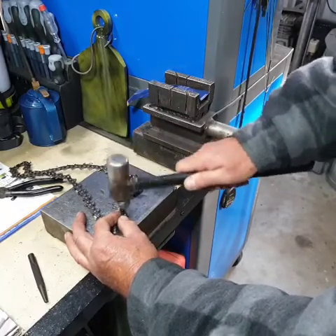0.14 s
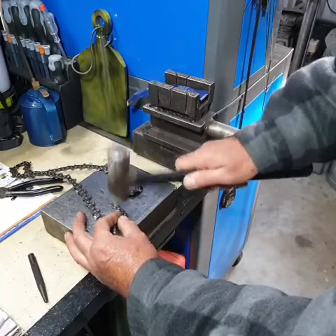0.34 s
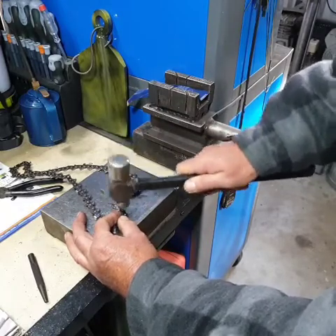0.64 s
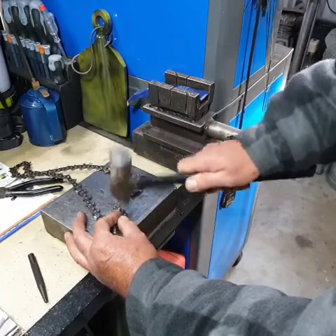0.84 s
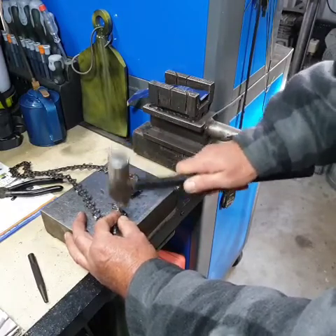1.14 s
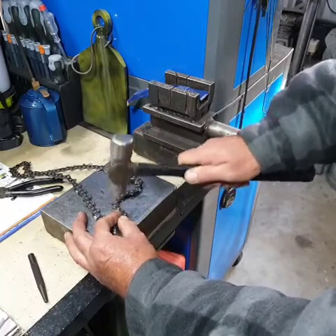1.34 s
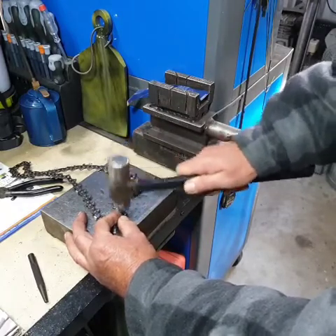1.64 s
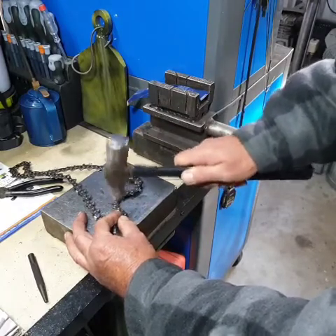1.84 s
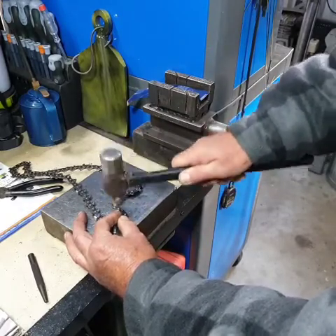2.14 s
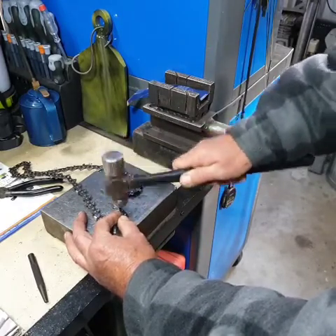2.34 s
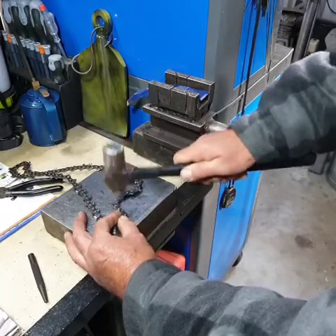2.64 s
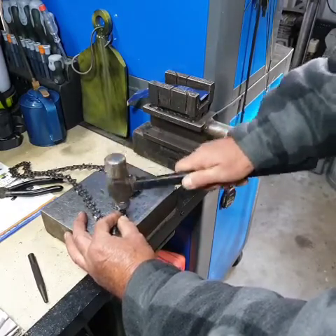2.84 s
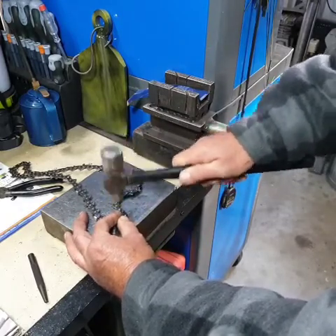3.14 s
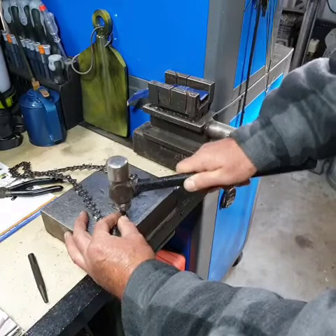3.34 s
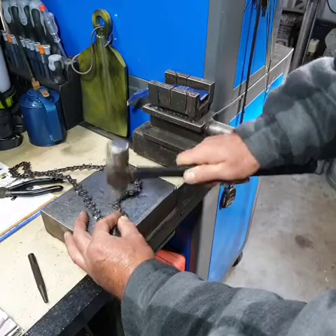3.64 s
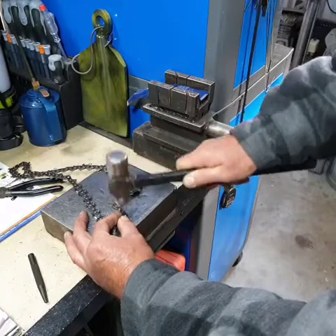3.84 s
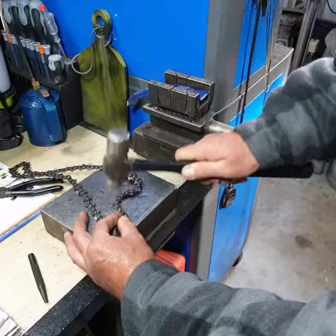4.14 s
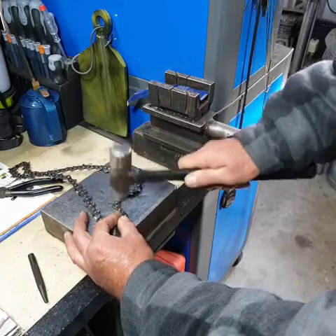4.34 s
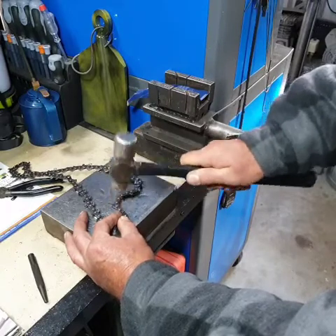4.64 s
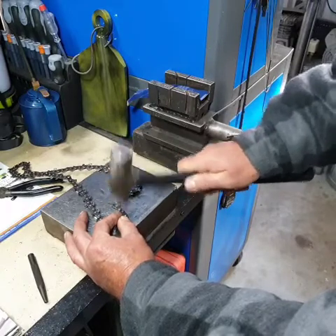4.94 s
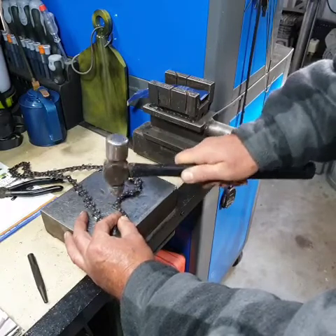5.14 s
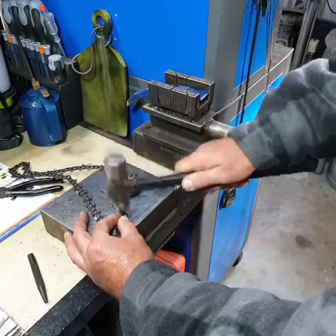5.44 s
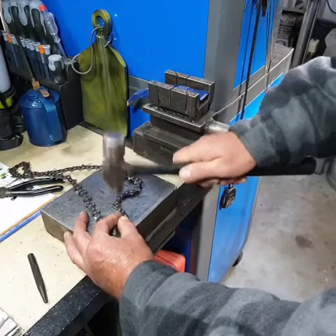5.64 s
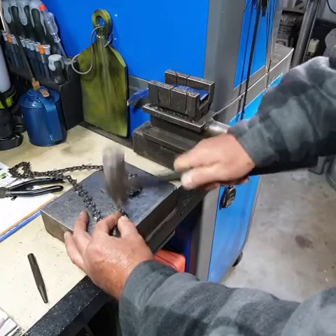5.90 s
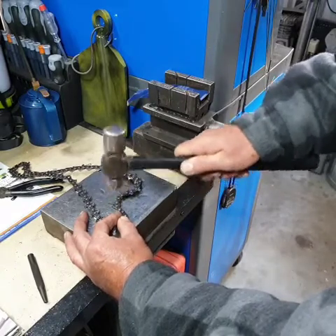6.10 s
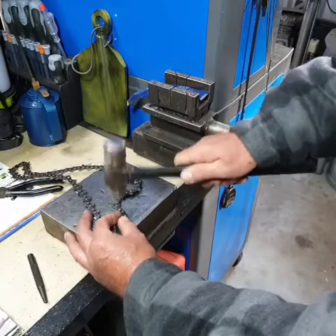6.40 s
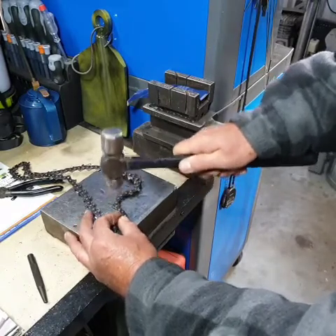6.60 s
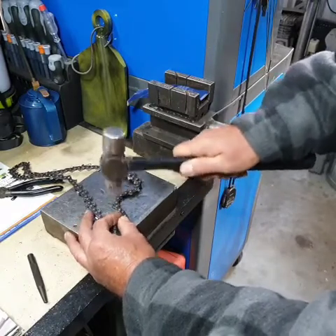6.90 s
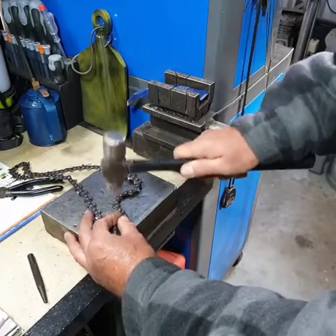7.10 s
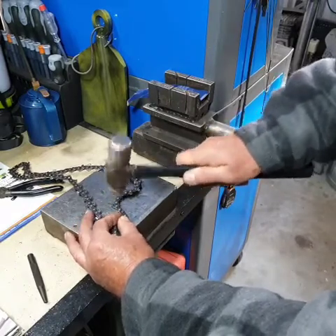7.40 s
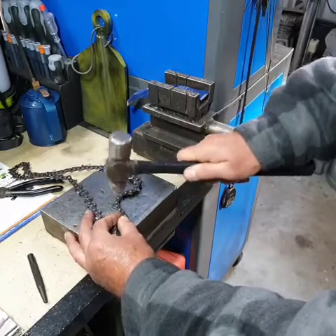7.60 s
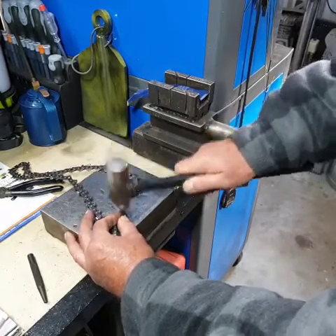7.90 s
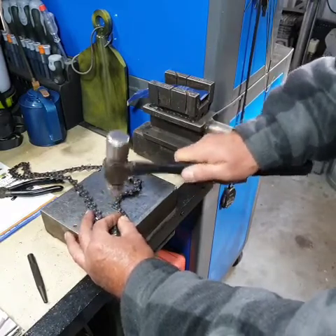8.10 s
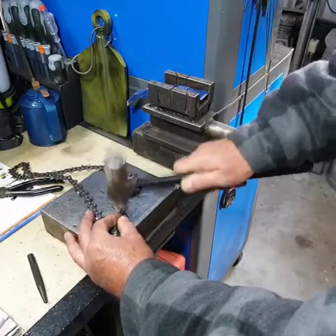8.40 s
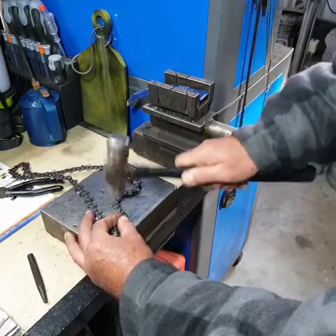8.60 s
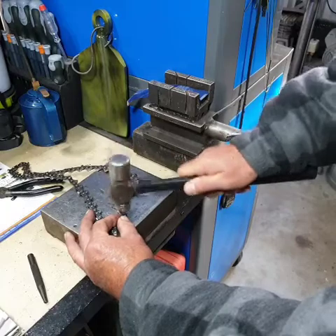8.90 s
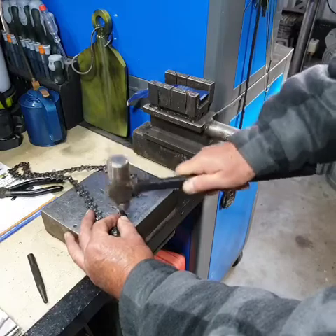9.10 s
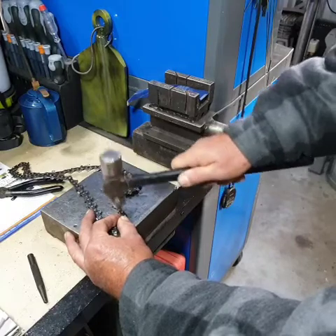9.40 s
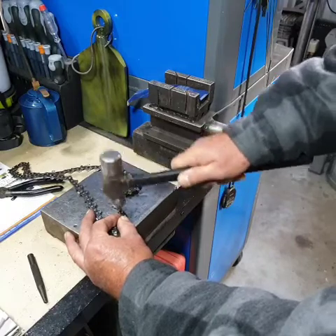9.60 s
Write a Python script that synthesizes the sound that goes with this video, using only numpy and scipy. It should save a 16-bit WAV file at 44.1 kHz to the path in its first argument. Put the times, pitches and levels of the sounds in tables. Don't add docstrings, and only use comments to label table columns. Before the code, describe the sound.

Rapid steady hammer taps on steel, each a short hard knock with a bright metallic tick and chain rattle, in a small room.

```python
import sys
import numpy as np
from scipy import signal
from scipy.fft import rfft, irfft
from scipy.io import wavfile
from scipy.ndimage import uniform_filter1d, minimum_filter1d

SR = 44100
rng = np.random.default_rng(int(sys.argv[2]) if len(sys.argv) > 2 else 0)


def waveform_to_disk(signal):
    frames = np.transpose(np.atleast_2d(signal))
    scaled = np.clip(frames, -1, 1) * 32767
    samples = np.round(scaled).astype(np.int16)
    wavfile.write(sys.argv[1], SR, samples)


def boost(x):
    u = np.asarray(x, float) / 20
    return 10 ** u


N = 429975
LEAD, TAIL = SR // 5, SR * 11 // 20
t = np.arange(TAIL) / SR


def along(points, hz, col=1):
    table = np.transpose(points)
    return np.interp(np.log(hz + 1), np.log(table[0] + 1), table[col])


def coloured(noise, points):
    hz = np.fft.rfftfreq(noise.shape[-1], 1 / SR)
    return irfft(rfft(noise) * boost(along(points, hz)), noise.shape[-1])


def hiss():
    hz, frames, z = signal.stft(rng.standard_normal((2, TAIL)), SR, nperseg=1024)
    return hz[:, None], frames, z


# pitch_hz, likeness (1 = the same)
LEFT_RIGHT_LIKENESS = [(60, 0.94), (290, 0.98), (640, 0.35), (1400, 0.039), (3000, 0.074), (15000, 0)]


def paired(z, hz):
    turn = np.arccos(np.clip(along(LEFT_RIGHT_LIKENESS, hz), -1, 1)) / 2
    mid = z[0] * np.cos(turn)
    side = z[1] * np.sin(turn)
    pair = signal.istft(np.array([mid + side, mid - side]), SR, nperseg=1024)[1][:, :TAIL]
    return pair / np.sqrt(np.mean(pair[:, :SR // 20] ** 2))


def rise(seconds):
    return 1 - np.exp(-t / seconds)


def silence():
    return np.zeros((2, LEAD + N + TAIL))


def add(out, start_s, sound):
    first = LEAD + round(start_s * SR)
    out[:, first:][:, :TAIL] += sound


# pitch_hz, level_db (per Hz)
AIR_COLOUR = [(30, -14), (60, 5.5), (200, -12), (500, -13.5), (2000, -36.5), (8000, -58)]


def air():
    noise = rng.standard_normal(N) + 0.3 * rng.standard_normal((2, N))
    rumble = coloured(noise, AIR_COLOUR)
    return boost(-65.5) * rumble / rumble.std()


# start_s, level_db, t60_s (time to fade 60 dB), rise_s, top_hz
FAR_CLACKS = [
    (5.211, -41, 0.3137, 0.0068, 8300),
    (5.679, -53, 0.4045, 0.017, 8000),
    (6.226, -38.5, 0.27, 0.0036, 15000),
    (6.522, -47, 0.44, 0.0018, 15000),
]


def far_clacks():
    out = silence()
    for start_s, level_db, t60_s, rise_s, top_hz in FAR_CLACKS:
        hz, _, z = hiss()
        bass_loss = 1 / (1 + (900 / (hz + 1)) ** 2)
        top_loss = 1 / (1 + (hz / top_hz) ** 8) / np.sqrt(1 + (hz / 4000) ** 2)
        sound = paired(z * bass_loss * top_loss, hz)
        add(out, start_s, boost(level_db - 60 * t / t60_s) * rise(rise_s) * sound)
    return out


# start_s, pitch_hz, level_db, t60_s
LINK_PINGS = [
    (.37, 4600, -72, .5),
    (.37, 6400, -77, .5),
    (3.13, 4620, -66, 0.44),
]


def link_pings():
    out = silence()
    for start_s, pitch_hz, level_db, t60_s in LINK_PINGS:
        drift = np.cumsum(0.082 * rng.standard_normal((2, TAIL)), axis=1)
        tone = np.sin(2 * np.pi * pitch_hz * t + drift)
        add(out, start_s, boost(level_db - 60 * t / t60_s) * rise(0.0092) * tone)
    return out


# pitch_hz, level_db
STEEL_COLOUR = [(3000, -2.5), (6000, -6.5), (8500, 3), (11800, 5.5), (14000, -1.5), (15500, -28.5)]
# start_s, level_db
LINK_BOUNCES = [
    (9.493, -47),
    (9.499, -50),
]


def link_bounces():
    out = silence()
    for start_s, level_db in LINK_BOUNCES:
        click = coloured(rng.standard_normal((2, TAIL)), STEEL_COLOUR)
        add(out, start_s, boost(level_db - 60 * t / 0.00806) * click)
    return out


# pitch_hz, early_t60_s, late_t60_s
ROOM_DECAY = [(61, 0.83, 1), (294, 0.15, 0.72), (1016, 0.17, 0.47), (3000, 0.15, 0.45), (8000, 0.17, 0.4),
              (15000, 0.16, 0.29)]


def room_fade(hz, frames):
    early = boost(-60 * frames / along(ROOM_DECAY, hz))
    late = boost(-15.5 - 60 * frames / along(ROOM_DECAY, hz, col=2))
    return early + late


# pitch_hz, level_db
RATTLE_COLOUR = [(2500, -11), (4000, 1), (6000, -0.5), (9000, 1.5), (12000, -3), (14500, -4), (15500, -46)]


def chain_rattle():
    hz, frames, z = hiss()
    z = z * room_fade(hz, frames) * boost(along(RATTLE_COLOUR, hz))
    return paired(z, hz) * rise(0.00067)


# pitch_hz, level_db, t60_s
HEAD_TONES = [(13350, -32.5, .25), (7300, -31.5, .12), (10900, -34, 0.16), (12255, -18, .2),
              (8400, -29, 0.14)]


def head_ring():
    ring = np.zeros(TAIL)
    for pitch_hz, level_db, t60_s in HEAD_TONES:
        fade = boost(level_db + rng.normal(0, 4) - 60 * t / t60_s)
        ring += fade * np.sin(2 * np.pi * pitch_hz * rng.normal(1, 0.003) * t)
    return ring


def steel_tick():
    burst = rng.standard_normal(TAIL) + 0.2 * rng.standard_normal((2, TAIL))
    tick = coloured(burst, STEEL_COLOUR) * boost(-60 * t / 0.0046) * rise(0.00028)
    tick[1] = np.roll(tick[1], shift=1)
    return tick


# pitch_hz, level_db, t60_s, left_minus_right_db
BENCH_TONES = [(109.8, -9, 0.16, 0), (246.6, -9.5, 0.17, 5.5), (277.8, -0.5, 0.09, -3.2),
               (325.7, -2, 0.12, 1), (422.6, -10, 0.12, -5.5), (558.7, -9.5, 0.11, -17.5),
               (597.5, -6, 0.09, -15), (672.5, -6.5, 0.038, 10), (765, -23.5, 0.084, 5),
               (847, -21.5, 0.1, -8.5), (932.4, -11.5, 0.13, 11), (980.5, -6, 0.083, 9.5),
               (1067.6, 2, 0.07, -6.5), (1146.7, -2.5, 0.038, 14), (1149.5, -41, 0.183, 3),
               (1227, -19, 0.23, -7), (1303, -13, 0.046, -26), (1452, -0.5, 0.042, 6.5),
               (1510, -35, 0.13, 0.5), (1582, -12.5, 0.068, 17.5), (1518.4, -1.5, 0.068, -0.5),
               (1669.5, -3, 0.06, -6.5), (1774, -20, 0.05, 20), (1893, -17, 0.122, 14),
               (1998, -22.5, 0.25, 11), (2180, -31, 0.14, 9.5), (2257, -11.5, 0.046, 7.5),
               (2410, -21, 0.064, 11), (2615, -17.5, 0.038, 20), (3200, -31, 0.14, 10.5)]
# pitch_hz, level_db, t60_s, left_minus_right_db
FRAME_TONES = [(51.7, -27, 0.21, 0.91)]
MODE_HZ, MODE_DB, MODE_T60_S, MODE_PAN_DB = np.transpose(sorted(BENCH_TONES + FRAME_TONES))[:, :, None]


def bench_modes():
    ear = np.array([0.5, -0.5])[:, None, None]
    late = np.clip(t + 2 * ear * 0.00006, 0, 1)
    swell = 1 - np.exp(-late * MODE_HZ / 0.57)
    sign = (-1.0) ** np.arange(len(MODE_HZ))[:, None]
    fade = boost(MODE_DB + ear * MODE_PAN_DB - 60 * late / MODE_T60_S)
    return sign * fade * swell * np.sin(2 * np.pi * MODE_HZ * late)


# pitch_hz, likeness (1 = the same)
BLOW_LIKENESS = [(100, 1), (1000, 0.84), (3000, 1), (6000, 0.14), (12000, 0.33)]
# pitch_hz, level_db (per Hz)
CLATTER_COLOUR = [(40, -24.5), (75, -27.5), (112, -9.5), (185, -20.5), (270, -3), (440, -9), (620, -6.5),
                  (800, -5.5), (1050, -6.5), (1540, -8), (2700, -13), (3300, -18), (7000, -33), (9500, -57)]


def bench_clatter(usual, thin, hard_db):
    hz, frames, fresh = hiss()
    same = np.clip(along(BLOW_LIKENESS, hz), 0, 1)
    hum = np.sum(boost(MODE_DB) / (1 + ((hz[:, 0] - MODE_HZ) / 35) ** 2), axis=0)[:, None]
    z = (same * usual + np.sqrt(1 - same ** 2) * fresh) * room_fade(hz, frames) * (1 + 0.89 * hum)
    z = z * boost(along(CLATTER_COLOUR, hz) - thin(hz) + (hard_db + 6) * upper(hz))
    return paired(z, hz) * rise(0.0007)


def upper(hz):
    return 1 / (1 + (2300 / (hz + 1)) ** 6)


def bend_loss(glance_db):
    depth_db = 0.38 * max(glance_db + 4, 0)
    return lambda hz: depth_db / (1 + (np.log(hz / 330 + 1e-3) / 0.5) ** 4)


def character(start_s, strength_db, glance_db):
    force = strength_db + 20
    glance = glance_db + 8
    cushion_db = -2.5 / (1 + (max(start_s, 0) / 1.45) ** 6)
    hard_db = -4.5 + 1.38 * force + 0.31 * glance + cushion_db
    rattle_db = -21.5 + 0.39 * glance
    return hard_db, rattle_db


# start_s, strength_db, glance_db (how much bare steel is caught)
EARLIER_BLOW = (-.11, -29, -6)
# start_s, strength_db, glance_db
FIRST_BLOWS = [(0.2125, -26, -6.5), (0.4615, -21.5, -9.5), (0.714, -21.5, -9), (0.9537, -26, 3.5),
               (1.2486, -25, -6.5), (1.502, -21.5, -9), (1.7383, -20, -7.5), (1.9757, -19.5, -10),
               (2.2189, -19.5, -7), (2.4448, -19.5, -3.5), (2.6729, -23.5, 4), (2.9379, -27, 6)]
# start_s, strength_db, glance_db
STEADY_BLOWS = [(3.1994, -20.5, -4.5), (3.4314, -20, -6), (3.6707, -20, -8), (3.899, -21.5, -4.5),
                (4.1417, -20, -13.5), (4.3891, -20.5, -9), (4.6219, -21.5, -9), (4.8566, -19.5, -7),
                (5.089, -20.5, -5.5), (5.335, -20.5, -8.5), (5.5723, -20, -7.5), (5.8044, -19.5, -9),
                (6.0477, -21.5, -12), (6.318, -21.5, -13.5), (6.5699, -23.5, -7.5)]
# start_s, strength_db, glance_db
LAST_BLOWS = [(6.8666, -20, -10.5), (7.1073, -19.5, -9), (7.3462, -21.5, -5), (7.582, -19, -6.5),
              (7.814, -20, -6.5), (8.0379, -19.5, -6.5), (8.2863, -23, -9), (8.5411, -24.5, -0.5),
              (8.7736, -21.5, -4.5), (9.0079, -22, -3), (9.228, -20.5, -2), (9.4538, -20.5, -10),
              (9.6858, -20, -3.5)]


def hammer():
    out = silence()
    modes = bench_modes()
    usual = hiss()[2]
    mode_hz = MODE_HZ[:, 0]
    for start_s, strength_db, glance_db in [EARLIER_BLOW] + FIRST_BLOWS + STEADY_BLOWS + LAST_BLOWS:
        hard_db, rattle_db = character(start_s, strength_db, glance_db)
        thin = bend_loss(glance_db)
        chance_db = 1.47 * rng.standard_normal(len(mode_hz))
        levels = boost(chance_db - thin(mode_hz) + (hard_db + 9.5) * upper(mode_hz))
        ring = np.einsum("k,ckt->ct", levels, modes)
        clatter = bench_clatter(usual, thin, hard_db)
        rattle = chain_rattle()
        tick = steel_tick()
        bright = boost(glance_db + 15.5) * tick + boost(rattle_db + 4.5) * (rattle + head_ring())
        blow = boost(10.0) * ring + boost(4.0) * clatter + boost([[1], [-1]]) * bright
        add(out, start_s, boost(strength_db) * blow)
    return out


def scene():
    struck = hammer() + far_clacks() + link_bounces() + link_pings()
    return (struck[:, LEAD:LEAD + N] + air()) * boost([[0.9], [-0.9]])


def roll_off(x):
    return signal.sosfilt(signal.butter(12, 15890, fs=SR, output="sos"), x)


def record(dry):
    x = signal.sosfilt(signal.butter(2, 60, "highpass", fs=SR, output="sos"), dry)
    x = signal.sosfilt(signal.butter(10, 15150, fs=SR, output="sos"), x)
    need = 1 / np.maximum(np.abs(x).max(0) / 0.99, 1)
    gain = uniform_filter1d(minimum_filter1d(need, size=88), size=44)
    return roll_off(x * gain)


dry = scene()
out = record(dry)
waveform_to_disk(out)
```